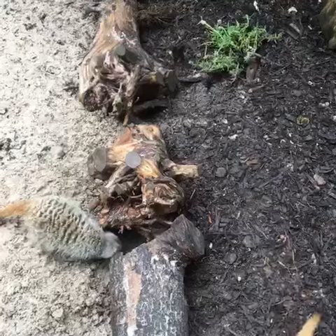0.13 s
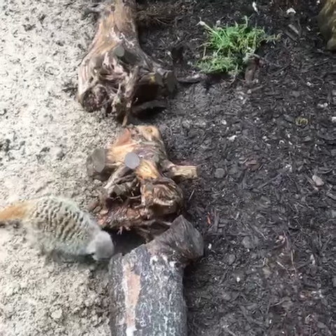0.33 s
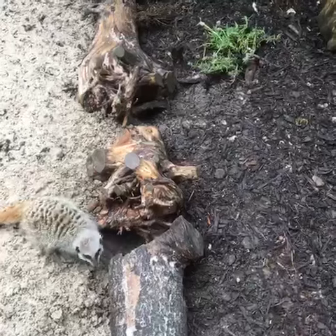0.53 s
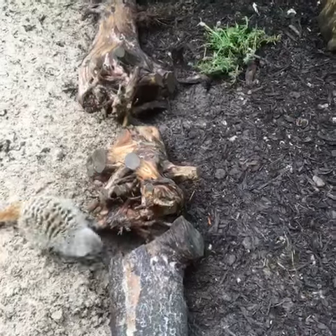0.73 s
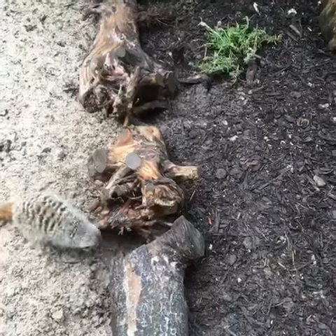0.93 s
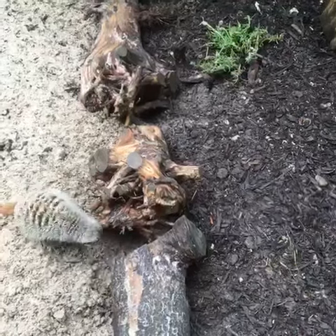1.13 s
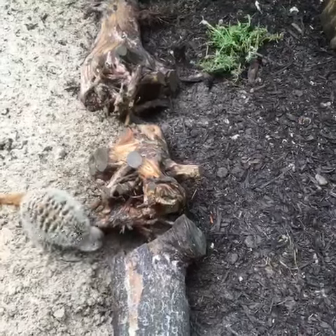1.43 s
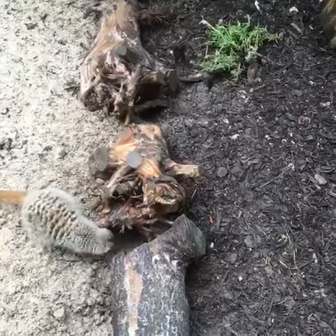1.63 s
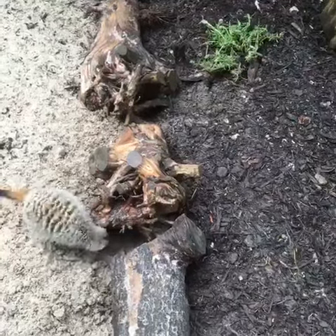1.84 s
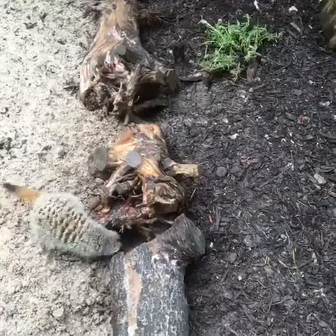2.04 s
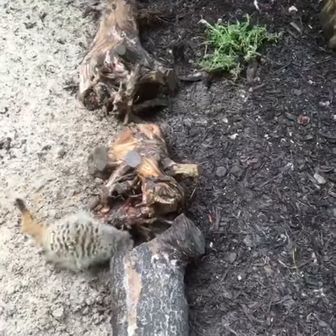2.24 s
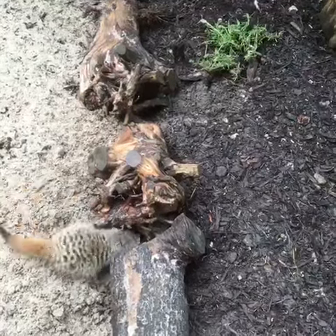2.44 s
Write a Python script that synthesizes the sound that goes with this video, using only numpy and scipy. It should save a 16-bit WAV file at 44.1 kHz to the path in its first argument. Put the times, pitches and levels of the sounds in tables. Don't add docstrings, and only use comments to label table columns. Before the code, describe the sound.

Short low harsh meerkat grunts, four in all, over paws scuffing sandy ground, faint distant traffic

```python
import sys
import numpy as np
from scipy import signal
from scipy.fft import rfft, irfft, next_fast_len
from scipy.io import wavfile
from scipy.ndimage import uniform_filter1d, map_coordinates

SR = 44100
rng = np.random.default_rng(int(sys.argv[2]) if len(sys.argv) > 2 else 0)


def wav_out(sig):
    wavfile.write(sys.argv[1], SR, np.round(np.clip(np.atleast_2d(sig).T, -1, 1) * 32767).astype(np.int16))


def makeup_ratio(level_db):
    decades = np.asarray(level_db, float) / 20
    return 10 ** decades


N = 114660

# time in seconds, strength in dB.
TRAFFIC_STRENGTH = [
    (0, -56.5),
    (.4, -54),
    (1.1, -56.5),
    (1.6, -56),
    (1.9, -52),
    (2.6, -59.5),
]
# frequency in Hz, level in dB.
RUMBLE_SPECTRUM = [(12, -43), (20, -8.5), (37, -1.5), (59, 2), (78, -4), (97, -12), (118, -11), (170, -34),
                   (220, -28), (370, -120)]
# frequency in Hz, level in dB.
HUSH_SPECTRUM = [(88, -23), (150, -3), (290, -2), (692, -11.5), (762, -8.5), (1100, -9.5), (3010, -20.5),
                 (3580, -19.5), (15300, -30.5)]
# peak in seconds, rise in seconds, fall in seconds, level in dB, centre in Hz.
PAW_STROKES = [(1.322, .004, 0.0087, -68, 9000), (2.107, 0.0022, 0.0055, -67, 7000),
               (1.205, .003, 0.0072, -66, 5000), (.322, 0.0046, 0.015, -64.5, 8440),
               (.8, 0.0086, 0.0075, -65.5, 11000), (0.827, 0.013, 0.015, -64, 9000),
               (1.041, 0.052, 0.13, -64, 9100), (1.4, .04, 0.057, -67.5, 10000),
               (1.458, 0.029, 0.013, -61.5, 6750), (1.518, 0.043, 0.043, -68, 10000),
               (1.68, 0.02, .03, -79, 11000), (1.8, 0.039, 0.075, -64.5, 10000),
               (1.845, 0.011, 0.0095, -57.5, 6540), (1.845, 0.013, 0.022, -63.5, 2770),
               (1.901, 0.039, 0.024, -71.5, 10000), (2.149, 0.024, 0.03, -68.5, 9170),
               (2.309, 0.061, 0.041, -61.5, 9100), (2.554, 0.036, .09, -58.5, 8600)]
# start in seconds, peak level in dB, ring in Hz, 60 dB decay in seconds.
GRIT_TICKS = [(.3135, -39.5, 7530, 0.0038), (.316, -29.5, 8340, 0.003), (0.318, -38, 8750, 0.0026),
              (.324, -58, 9000, .006), (.797, -57, 12900, .008), (.808, -56, 13000, .008),
              (.816, -51, 9300, .006), (0.824, -51, 6800, 0.0065), (1.319, -51, 9040, 0.0084),
              (1.3268, -46.5, 12200, 0.0051), (1.658, -59, 11000, .005), (1.838, -56, 3130, 0.033),
              (1.846, -55, 3220, .03), (1.695, -62, 11000, .005), (1.207, -69, 5000, 0.0047),
              (2.1062, -55, 4500, .008)]
# start in seconds, length in seconds, level in dB,
# starting pitch in Hz, final pitch in Hz.
GRUNT_PUFFS = [
    [(.774, 0.045, -45, 351, 385), (.804, 0.043, -38.5, 385, 308.3), (.838, 0.0354, -43, 354.4, 326.7),
     (.866, 0.031, -52, 920, 1016)],
    [(1.037, 0.0154, -43, 430, 445), (1.058, 0.029, -39, 476, 507), (1.097, 0.028, -44, 518.5, 370.4)],
    [(1.376, 0.017, -47, 304, 318), (1.392, 0.019, -37.5, 341.5, 385), (1.429, 0.028, -43.5, 335, 373),
     (1.461, 0.0282, -47.5, 417, 314)],
    [(2.247, 0.028, -40, 381, 532), (2.282, 0.021, -40, 398, 450), (2.321, 0.026, -44, 164.3, 173.3)],
]
HOARSENESS = [
    (.36, .45, .1),
    (.14, .4, .025),
    (.12, .22, .035),
    (.09, .25, .025),
]
# frequency in Hz, width in Hz, level in dB.
RESONANCES = [
    [(345, 303, 4.5), (786, 140, -6), (1050, 280, -3.5), (1520, 320, -30), (1843, 380, -8),
     (2390, 460, -19)],
    [(445, 430, 1.5), (864, 470, -6.5), (1250, 540, -18), (1650, 540, -18), (2410, 290, -20.5)],
    [(385, 243, 3), (930, 120, -10), (1225, 196, -11.5), (1630, 270, -18.5), (2330, 490, -27)],
    [(450, 266, 4), (1010, 400, -23), (1190, 160, -9), (1482, 120, -18.5), (1930, 120, -16.5)],
]
BREATH_LEVELS = [-58.5, -52, -55, -55.5]
PAIRED_REGISTER = (250, 600)


def unit(x):
    return x / np.sqrt(np.mean(x ** 2) + 1e-20)


def along(points, hz):
    f, db = np.transpose(points)
    return np.interp(np.log(hz + 1), np.log(f + 1), db, left=-120, right=-120)


def wobble(rate, size=N):
    knots = rng.standard_normal(size // 64 + 4)
    return map_coordinates(knots, [np.arange(size) * rate / SR])


def filtered(x, response):
    m = next_fast_len(len(x) + 8192)
    return irfft(rfft(x, m) * response(np.fft.rfftfreq(m, 1 / SR)), m)[:len(x)]


def resonance(f, centre_hz, width_hz):
    damping = 1j * f * width_hz
    return damping / (centre_hz ** 2 - f * f + damping)


def swell(t, rise, fall):
    return np.exp(-.5 * (t / np.where(t < 0, rise, fall)) ** 2)


def traffic():
    rumble = unit(filtered(rng.standard_normal(N), lambda f: makeup_ratio(along(RUMBLE_SPECTRUM, f))))
    strength_db = 3 + np.interp(np.arange(N) / SR, *np.transpose(TRAFFIC_STRENGTH))
    return makeup_ratio(strength_db) * rumble


def hush():
    level_db, patch_db = -62, 1.56
    z = signal.stft(rng.standard_normal(N), nperseg=512)[2]
    field = uniform_filter1d(rng.standard_normal(z.shape), 6, 0)
    field = uniform_filter1d(field, 14, 1)
    patchy = signal.istft(z * makeup_ratio(patch_db * unit(field)), nperseg=512)[1][:N]
    return makeup_ratio(level_db) * unit(filtered(patchy, lambda f: makeup_ratio(along(HUSH_SPECTRUM, f))))


def walls(near):
    level_db, t60_s, dull_hz, gap_s = -12.5, 0.067, 3070, .004
    t = np.arange(SR // 4) / SR
    tail = filtered(rng.standard_normal(len(t)), lambda f: 1 / (1 + 1j * f / dull_hz))
    tail = tail * makeup_ratio(-60 * t / t60_s) * (t > gap_s)
    return makeup_ratio(level_db) * signal.fftconvolve(near, tail / np.linalg.norm(tail))[:N]


def scuffs():
    octaves, grains_per_s, grain_spread_db, grain_share = 0.91, 5100, 2.5, 0.31
    before = SR // 5
    t = (np.arange(SR // 2) - before) / SR
    out = np.zeros(N + SR)
    for s, rise, fall, db, centre_hz in PAW_STROKES:
        hit = rng.random(len(t)) < grains_per_s / SR
        size = np.minimum(rng.exponential(size=len(t)), 3.5)
        hiss = rng.standard_normal(len(t))
        grains = unit(hit * makeup_ratio(grain_spread_db * size) * np.sign(hiss))
        sand = np.sqrt(grain_share) * grains + np.sqrt(1 - grain_share) * hiss
        band = unit(filtered(sand, lambda f: np.exp(-.5 * (np.log2(f / centre_hz + 1e-6) / octaves) ** 2)))
        unsteady_db = 0.45 * wobble(33.3, size=len(t))
        out[round(s * SR) - before:][:len(t)] += makeup_ratio(db + unsteady_db) * swell(t, rise, fall) * band
    return out[:N]


def grit():
    crack_db, onset_s = -17, 0.000082
    out = np.zeros(N)
    t = np.arange(SR // 20) / SR
    for s, db, hz, t60 in GRIT_TICKS:
        ring = np.sin(2 * np.pi * hz * t)
        ring += 0.23 * np.sin(2 * np.pi * 0.518 * hz * t)
        ring += 0.24 * np.sin(2 * np.pi * 1.4 * hz * t)
        crack = makeup_ratio(crack_db) * np.diff(rng.standard_normal(len(t) + 1)) / 2
        decay = makeup_ratio(db - 60 * t / t60) * (1 - np.exp(-t / onset_s))
        out[round(s * SR):][:len(t)] += decay * (ring + crack)
    return out


def rasp():
    peak_s, rise_s, fall_s, level_db = .829, .009, .014, -51
    centre_hz, width_hz, bursts_per_s = 3250, 700, 170
    t = np.arange(N) / SR - peak_s
    gate = (1 + np.cos(2 * np.pi * bursts_per_s * t + 2 * wobble(87))) ** 2
    bursts = gate * rng.standard_normal(N)
    band = unit(filtered(bursts, lambda f: resonance(f, centre_hz, width_hz) ** 2))
    return makeup_ratio(level_db) * swell(t, rise_s, fall_s) * band


def throat(x, rings, tilt_db):
    chest_hz = 167

    def response(f):
        total = 0
        for k, (centre, width, db) in enumerate(rings):
            level = makeup_ratio(db + tilt_db * (centre - rings[0][0]) / 1000)
            peak = resonance(f, centre, width) * resonance(f, centre, 1.53 * width)
            peak = peak * resonance(f, centre, (3.9 if k else 1.9) * width)
            total = total + (-1) ** k * level * peak
        return total * 1j * f / (chest_hz + 1j * f)

    return unit(filtered(x, response))


def puff(length, from_hz, to_hz, rings, tilt_db, hoarse):
    attack_s, release_s, sag_db, shimmer_db = 0.0036, 0.0097, 3, 0.07
    glide_curve, air_tilt_db = 0.448, 0.5
    noise, uneven, jitter = hoarse
    size = SR // 8
    t = np.arange(size) / SR
    glide = np.minimum(t / length, 1) ** glide_curve
    hz = (from_hz + (to_hz - from_hz) * glide) * (1 + jitter * wobble(136, size=size))
    phase = 2 * np.pi * np.cumsum(hz) / SR

    k = np.arange(1, 49)[:, None]
    paired = PAIRED_REGISTER[0] < from_hz < PAIRED_REGISTER[1]
    strength = np.where(k % 2, uneven * paired, k * from_hz < SR / 2)
    pulses = (strength * np.cos(k * phase / 2)).sum(0)
    pulses = pulses * makeup_ratio(shimmer_db * (-1 + 3.4 * noise) * wobble(341, size=size))
    air = (1 + np.cos(phase)) * rng.standard_normal(size)

    voice = np.sqrt(1 - noise) * throat(pulses, rings, tilt_db)
    voice += np.sqrt(noise) * throat(air, rings, tilt_db + air_tilt_db)
    shape = np.clip(t / attack_s, 0, 1) * np.clip((length - t) / release_s, 0, 1)
    return voice * np.sin(np.pi / 2 * shape) ** 2 * makeup_ratio(sag_db * (.5 - t / length))


def grunts():
    brighter_db_per_khz, breath_tilt_db = 0.06, 6
    out = np.zeros(N + SR)
    t = np.arange(SR // 4) / SR
    for puffs, rings, breath_db, hoarse in zip(GRUNT_PUFFS, RESONANCES, BREATH_LEVELS, HOARSENESS):
        loudest_db = max(row[2] for row in puffs)
        for s, length, db, from_hz, to_hz in puffs:
            tilt_db = brighter_db_per_khz * (db - loudest_db)
            voice = puff(length, from_hz, to_hz, rings, tilt_db, hoarse)
            out[round(s * SR):][:SR // 8] += makeup_ratio(db) * voice
        start = puffs[0][0]
        whole = puffs[-1][0] + puffs[-1][1] - start
        shape = np.interp(t, [0, .025, whole - .01, whole + 0.024], [0, 1, 1, 0])
        breath = throat(rng.standard_normal(len(t)), rings, breath_tilt_db)
        out[round(start * SR):][:len(t)] += makeup_ratio(breath_db) * shape * breath
    return out[:N]


def scene():
    near = grunts() + grit() + rasp()
    mix = near + walls(near) + scuffs() + traffic() + hush()
    return mix[None]


def band_limit(x):
    return signal.sosfilt(signal.butter(12, 15600, fs=SR, output="sos"), x)


def record(dry):
    low_hz, top_hz = 29.6, 15340
    mix = filtered(dry[0], lambda f: (f < top_hz) * (1j * f / (low_hz + 1j * f)) ** 2)
    return band_limit(mix[None])


dry = scene()
out = record(dry)
wav_out(out)
```